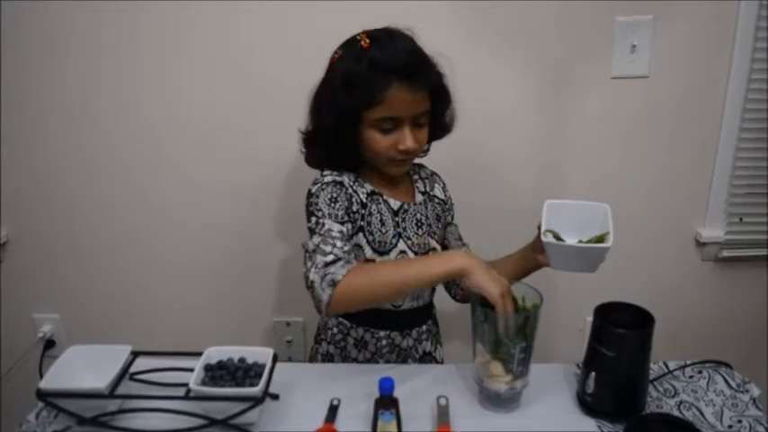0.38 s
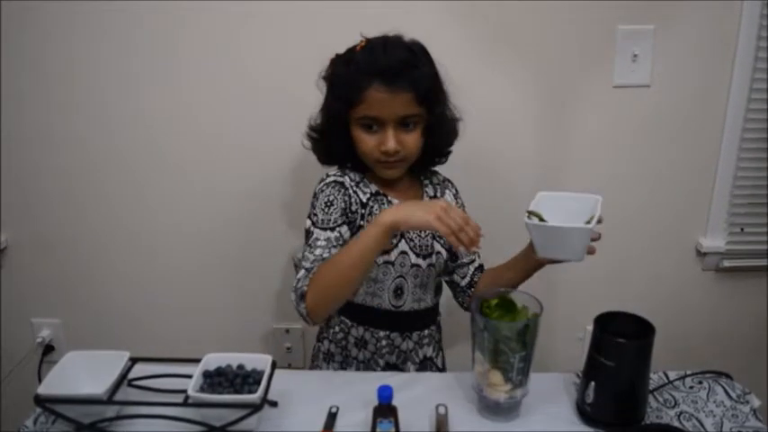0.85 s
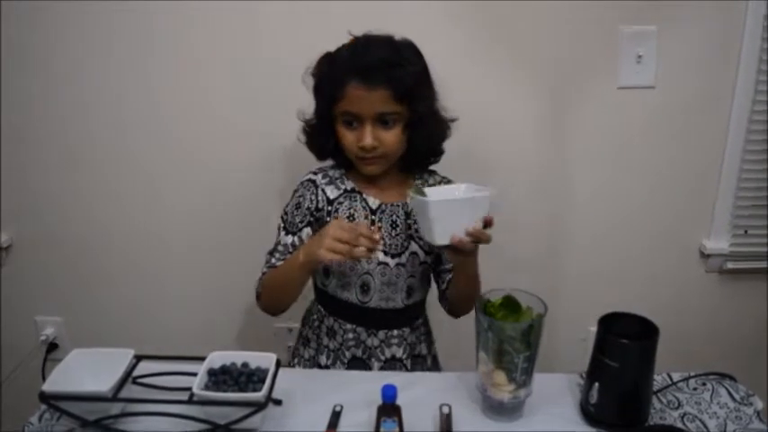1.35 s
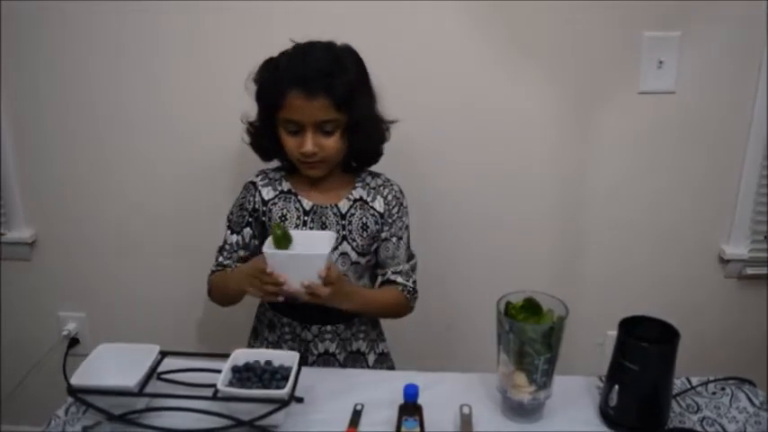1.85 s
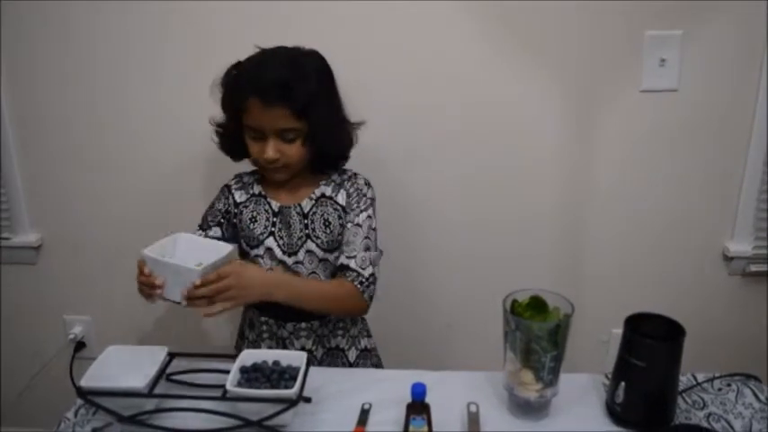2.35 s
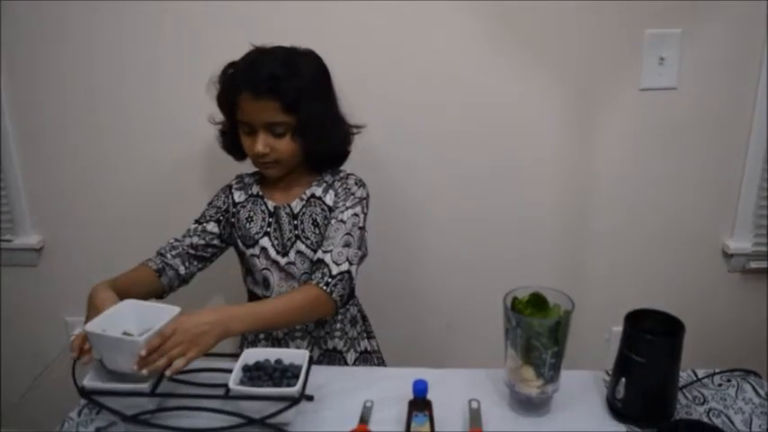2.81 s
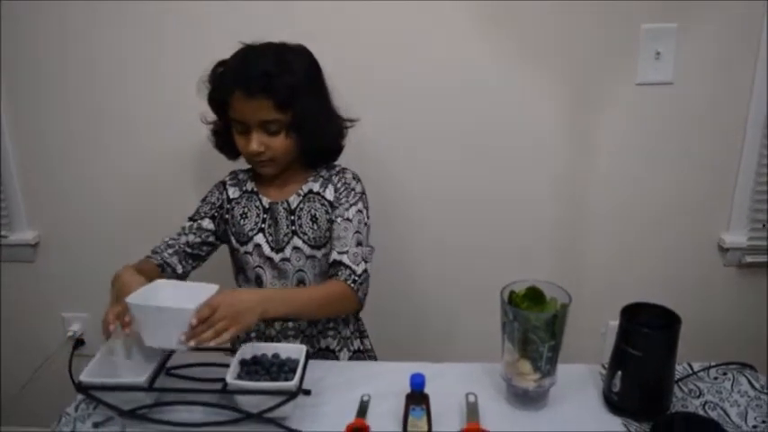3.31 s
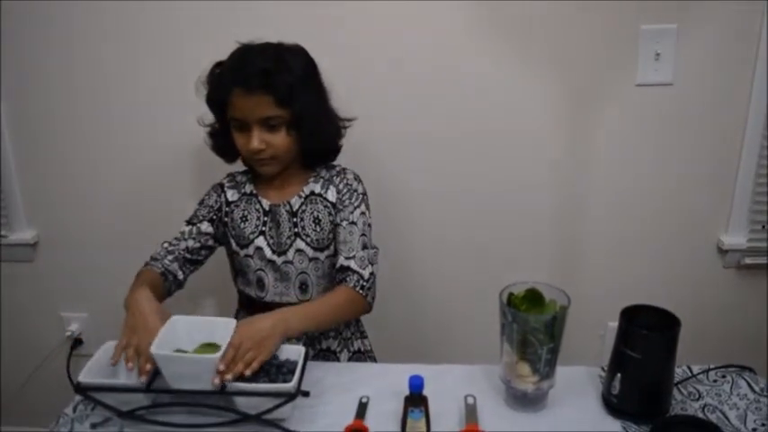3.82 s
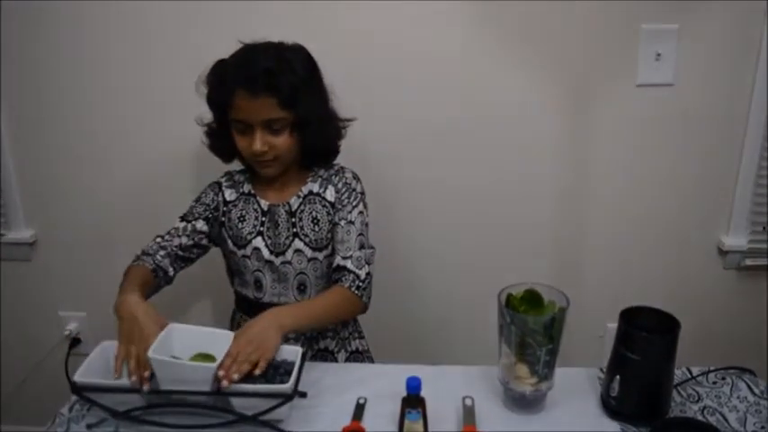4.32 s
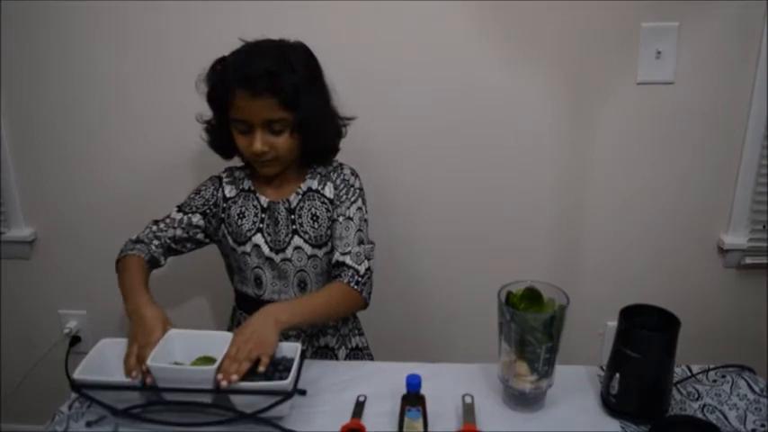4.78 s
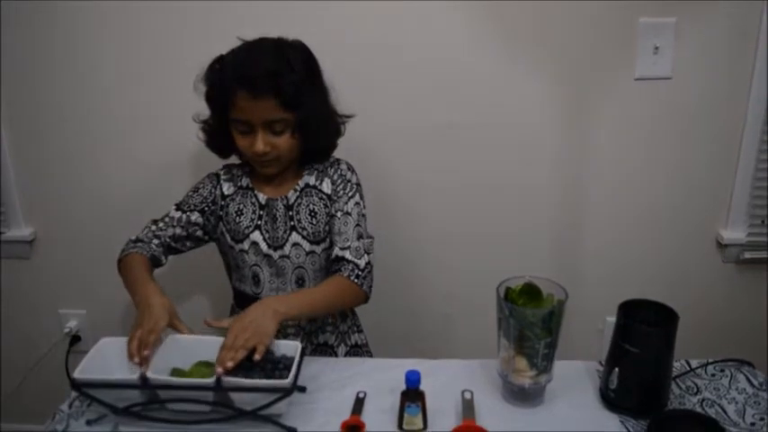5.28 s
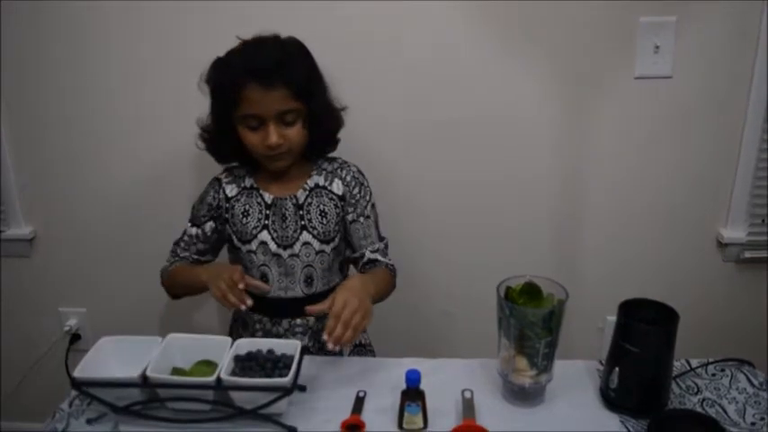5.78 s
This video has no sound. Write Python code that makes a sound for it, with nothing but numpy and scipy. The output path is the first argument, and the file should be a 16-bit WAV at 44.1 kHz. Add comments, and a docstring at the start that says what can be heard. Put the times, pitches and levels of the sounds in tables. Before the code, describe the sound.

In a quiet bare-walled kitchen, leaves crumple softly as fingers press them into a jar. After a pause, skin swishes over a glazed bowl, which then clinks ringingly onto a dish. Two seconds later it drops between neighbouring dishes with a loud, quick clatter, followed by a smaller knock and a faint brush of palms. The microphone stands at some distance, catching room echo, rumble and light hiss.

```python
"""Crockery knocks in a quiet kitchen: a bowl is set on a dish, then drops between neighbours in a wire stand.
Each blow rings decaying ceramic modes, cracks at the contact and thumps the table under the stand.
Before that leaves are pressed into a jar and the bowl swishes through the hands (noise under swelling gains);
late on, palms brush. Bare walls echo it all over room rumble and hiss."""
import sys
import numpy as np
from scipy import signal
from scipy.fft import rfft, irfft
from scipy.io import wavfile

SR = 44100
rng = np.random.default_rng(int(sys.argv[2]) if len(sys.argv) > 2 else 0)


def dump(signal):
    """Clip the signal to [-1, 1] and save it as 16-bit WAV at the path in sys.argv[1]."""
    limited = np.clip(np.atleast_2d(signal).T, -1, 1)
    pcm = np.round(limited * 32767).astype(np.int16)
    wavfile.write(sys.argv[1], SR, pcm)


def convert_level_to_amplitude(level_db):
    """Map a level in decibels to its linear amplitude factor."""
    exponent = np.asarray(level_db, float) / 20
    return 10 ** exponent


N = 260190
T = np.arange(N) / SR  # s
T_RING = T[:SR // 3]  # s, span of one blow


def unit(x):
    """Scale to rms 1."""
    return x / np.sqrt(np.mean(x ** 2))


def colour(x, points):
    """Shape the spectrum by (Hz, dB) points joined on a log-frequency axis; rms 1."""
    hz, db = np.transpose(points)
    f = np.fft.rfftfreq(len(x), 1 / SR) + 1
    gain = convert_level_to_amplitude(np.interp(np.log(f), np.log(hz), db))
    return unit(irfft(rfft(x) * gain, len(x)))


def band(x, hz, width_hz):
    """Resonant band-pass applied twice for steep skirts; width is that of one pass."""
    b, a = signal.iirpeak(hz, hz / width_hz, SR)
    once = signal.lfilter(b, a, x)
    return signal.lfilter(b, a, once)


def grains(rate_hz, spread_db, hiss):
    """Tiny slips at random moments and of widely spread size, over plain noise."""
    hit = rng.random(N) < rate_hz / SR
    size = convert_level_to_amplitude(spread_db * rng.exponential(size=N)) * rng.standard_normal(N)
    return unit(hit * size) + hiss * rng.standard_normal(N)


def strokes(rows, fade_db_per_s):
    """Gain over time: each stroke swells to its peak, then fades at a steady dB rate; powers add."""
    peak_s, swell_s, db = np.transpose(rows)[:, :, None]
    swell_loss_db = 18.5 * (peak_s - T) / swell_s  # climbs 18.5 dB in the swell time
    fade_loss_db = fade_db_per_s * (T - peak_s)
    gains = convert_level_to_amplitude(db - np.maximum(swell_loss_db, fade_loss_db))
    return np.sqrt((gains ** 2).sum(0))


# room tone spectrum: f/Hz, relative level/dB
ROOM_COLOUR = [(15, -46), (25, -24), (49, -3), (80, -7), (97, -6.5), (170, -1.5), (229, -5.5), (301, -7),
               (394, -13.5), (591, -16), (641, -18), (714, -15), (1890, -22.5), (9570, -31.5),
               (16000, -35.5)]


def room():
    """House rumble in the bass, a little lumpy, over steady microphone hiss."""
    return convert_level_to_amplitude(-50) * colour(grains(300, 0.9, 3.45), ROOM_COLOUR)


# leaf spectrum: f/Hz, relative level/dB
LEAF_COLOUR = [(180, -29), (300, -15), (421, -5), (599, 0), (867, -26), (1070, -1.5), (1340, -4.5),
               (1970, -7), (2130, -11), (3090, -1), (5170, -7.5), (9220, -2.5), (14000, -14)]
# fingers press the leaves: peak t/s, swell t/s, dull level/dB, bright level/dB
PRESSES = [(.008, 0.011, -48.5, -52), (.049, 0.0072, -48, -48.5), (.085, 0.057, -49, -50.5),
           (.245, .05, -52.5, -53), (.292, 0.079, -41, -44.5), (0.321, 0.02, -40, -46.5),
           (.455, 0.013, -52.5, -54), (.492, 0.027, -53.5, -53.5)]


def leaves():
    """Crumpling leaves: a duller body of creases and a brighter crackle of edges."""
    peak_s, swell_s, dull_db, bright_db = np.transpose(PRESSES)
    split_hz, fade_db_per_s = 4000, 357
    crumple = colour(grains(3000, 1.5, 0.8), LEAF_COLOUR)
    dull = signal.sosfilt(signal.butter(3, split_hz, fs=SR, output="sos"), crumple)
    bright = signal.sosfilt(signal.butter(3, split_hz, "high", fs=SR, output="sos"), crumple)
    dull_gain = strokes(np.c_[peak_s, swell_s, dull_db], fade_db_per_s)
    bright_gain = strokes(np.c_[peak_s, swell_s, bright_db], fade_db_per_s)
    return dull_gain * unit(dull) + bright_gain * unit(bright)


# faint treble whispers: peak t/s, swell t/s, level/dB
WHISPERS = [(1.474, .03, -61.5), (2.232, .03, -63), (3.522, 0.045, -65.5), (3.84, .02, -64.5),
            (4.53, .03, -65), (4.75, .1, -67)]


def whispers():
    """Grainy noise in a narrow treble band, faintly swelling and slowly fading."""
    treble = band(grains(820, 1.3, 0.86), 9640, 2000)
    return strokes(WHISPERS, 53) * unit(treble)


# sliding skin spectrum: f/Hz, relative level/dB
SWISH_COLOUR = [(600, -32), (1100, -6.5), (1230, -15), (1400, -3.5), (1650, -23), (2200, -2), (2400, -4),
                (2630, 3), (3100, -13.5), (4200, -20), (5200, -6.5), (7600, -8), (9500, -11.5),
                (11500, -6.5), (12500, -28)]
# skin slides over the glaze: peak t/s, swell t/s, level/dB
SLIDES = [(1.976, 0.01, -37), (2.028, 0.054, -34.5), (2.055, .02, -45)]


def swish():
    """Dry skin slides on glaze: dense small slips, coloured."""
    return strokes(SLIDES, 450) * colour(grains(4000, 0.6, 1.1), SWISH_COLOUR)


def ring(hz, width_hz, db):
    """Sum of decaying sines; neighbours start in opposite directions, wide resonances die fast and start louder."""
    t = T_RING[:, None]
    sign = (-1) ** np.arange(len(hz))
    fade = width_hz * np.exp(-np.pi * width_hz * t) * sign
    modes = convert_level_to_amplitude(db) * fade * np.sin(2 * np.pi * np.array(hz) * t)
    return modes.sum(1) / np.mean(width_hz)


# modes of each piece of crockery: f/Hz
PITCHES = dict( bowl=[755, 862, 968, 1050, 1168, 1297, 1459, 1700, 1805, 1912, 2376, 2487, 2766, 4003, 4230, 6500, 7160, 7711, 8740, 9200, 9604, 9738, 9916],
           left=[759, 1190, 1440, 1970, 2503, 2920, 3280, 4006, 4740, 5170, 5420, 5660, 6280, 6920, 7130, 7380, 7570, 8460, 8780, 9110, 9320, 9440, 9750, 11100],
           middle=[619, 1200, 1950, 2070, 2290, 2438, 2785, 3260, 3375, 3698, 4040, 4285, 4570, 4760, 4931, 5710, 6590, 6930, 7244, 7660, 8510, 8770, 9150, 9560, 9980, 11800],
           right=[2250, 2500, 3240, 3380, 3518, 3770, 3930, 4205, 4565, 4920, 5090, 5335, 5705, 6410, 6840, 7380, 8480, 8770, 9180, 9380, 9730],
           stand=[3520, 4720, 4990, 5220], rim=[2050, 2500, 2860, 4450, 9650])
# the same modes, in order: width/Hz, relative level/dB
RINGS = dict( bowl=[(34.7, -2), (30.3, 6), (45, 3), (23.148, -14), (22, 2.5), (23.148, 2), (12, 9),
         (29.8, -31), (28, -32), (27.5, 1), (25, -2), (20.5, 0), (22.68, -7.5), (25.2, -13), (22, -7),
         (185.19, -63), (37.037, -22), (23.6, -3.5), (30, -17), (30, -17), (23.8, -14), (25, -8),
         (32.4, -10)], left=[(31.481, -2), (34.8, 3), (35, -7.5), (26, -5.5), (30, 3), (25, 0), (109, -19),
         (46, -3.5), (73, -24), (49, -26), (26, -9), (25, -5), (31, -7), (25, -23), (27, -17), (108, -7.5),
         (25, -23), (32, -8), (44, -16), (36, -12), (25, -23), (30.24, -2), (30.24, -6), (40, -34)],
         middle=[(26.6, -7), (78, -12), (25, -2), (64, -2.5), (18, 6.5), (13, 7), (31, -4.5), (29, -22),
         (32, -3), (20, -12), (27, -3), (42, -20), (26, 0.5), (41, -14), (40, 2), (34, -1.5), (91, -10),
         (73, -5), (90, 3.5), (91, -16), (32, -9), (89, -17), (25, -10), (60, 4), (73, -11), (73, -16)],
         right=[(30, -5.5), (11, 6), (25, -10), (40, -11.5), (24.8, -8), (25, -18), (71, -5.5), (33.4, -7),
         (37, -3), (25, -11), (28, -7), (25, -10), (51, -5), (29, -12), (24, -9), (38, -3), (44, -16),
         (37, -15), (71, -10.5), (25, -12), (26, -9)], stand=[(40, -5), (30, -4), (35, 3), (30, -0.5)],
         rim=[(74, -4.5), (60, -2), (67, -5.5), (35, -1), (100, -9)])


def dish_rings():
    """Ceramic modes of each piece, struck once."""
    return {dish: ring(PITCHES[dish], *np.transpose(RINGS[dish])) for dish in RINGS}


# table top modes: f/Hz, width/Hz, relative level/dB
TABLE = [(120.6, 6.7, -9), (155.8, 5.6, 7), (204.4, 9.9, -1), (249, 15, 8), (351.7, 36, 3), (466, 58, 0.5)]


def table_thump():
    """Table top modes; the heavy top takes a while to get moving."""
    rise_s = 0.012
    return ring(*np.transpose(TABLE)) * (1 - np.exp(-T_RING / rise_s))


# low, middle and high crack bands: f/Hz, width of one pass/Hz
CRACKS = [(1100, 660), (3400, 3800), (7500, 6500)]
# high crack of each piece against its middle crack: level/dB
EDGE_DB = dict(bowl=0, stand=-9, left=-7, middle=-19, right=-25, rim=-12)


def contact_crack(dish, low_db, middle_db):
    """First touch, then rough glaze chatters; three bands, each scaled by its peak."""
    push = 0.28 * rng.standard_normal(len(T_RING)) * np.exp(-T_RING / 0.002)
    push[0] = -1
    # small dishes radiate no bass
    push = signal.sosfilt(signal.butter(4, 650, "high", fs=SR, output="sos"), push)
    out = np.zeros(len(push))
    levels_db = low_db, middle_db, middle_db + EDGE_DB[dish]
    for db, (hz, width_hz) in zip(levels_db, CRACKS):
        crack = band(push, hz, width_hz)
        out += convert_level_to_amplitude(db) * crack / np.abs(crack).max()
    return out


# blows: what rings, t/s, then level/dB of ring, low crack, middle crack, table thump
BLOWS = [("bowl", 2.8137, -20.5, -4, -27.5, -48), ("stand", 2.851, -43.5, -38, -47, -36),
         ("left", 4.8990, -30.5, -20, -26, -39), ("left", 4.9080, -15.5, -13.5, -6, -34),
         ("left", 4.9180, -29, -19.5, -29, -27.5), ("middle", 4.9592, -24.5, -16, -21, -26.5),
         ("middle", 4.966, -18, -19.5, -6.5, -36), ("middle", 4.9772, -46, -39, -20, -29.5),
         ("right", 5.2475, -26.5, -31, -18.5, -38.5)]
# light ticks on a rim: t/s, ring level/dB
TICKS = [(3.0498, -45), (5.7860, -48), (5.8860, -46)]


def blows():
    """Every blow rings a dish and thumps the table top (first row) and cracks at the contact (second row)."""
    out = np.zeros((2, N + SR))
    rings, thump = dish_rings(), table_thump()
    # a tick's low crack, middle crack and thump follow its ring level
    ticks = [("rim", s, db, db + 0.5, db - 2, db - 5.5) for s, db in TICKS]
    for dish, s, ring_db, low_db, middle_db, thump_db in BLOWS + ticks:
        start = int(s * SR)
        span = slice(start, start + len(T_RING))
        out[0, span] += convert_level_to_amplitude(ring_db) * rings[dish] + convert_level_to_amplitude(thump_db) * thump
        out[1, span] += contact_crack(dish, low_db, middle_db)
    return out[:, :N]


# palm spectrum: f/Hz, relative level/dB
HAND_COLOUR = [(590, -40), (1000, -10), (1400, -16), (2290, -4), (3890, -14), (4620, -0.5), (5860, -13),
               (8710, -9), (15000, -22)]
# palms brush: peak t/s, swell t/s, level/dB
BRUSHES = [(5.87, .08, -53), (5.888, 0.0093, -39)]


def palms():
    """Palms brush: sparser slips of wider spread, coloured."""
    return strokes(BRUSHES, 300) * colour(grains(1800, 1.9, 0.9), HAND_COLOUR)


# reverberation time of the walls: f/Hz, T60 t/s
WALL_T60 = [(150, 0.49), (1000, 0.34), (4000, 0.35), (10000, 0.22)]
# table and near wall: delay t/s, level/dB
ECHOES = [(.0045, -13), (.0098, -9.5)]


def walls(x, wet_db):
    """Two early echoes in a dense tail that sets in at once and loses its treble first."""
    t = T[:SR // 2]
    hz, t60_s = np.transpose(WALL_T60)
    tail = np.zeros(len(t))
    for f in 125 * 2.0 ** np.arange(7):  # octaves, Hz
        noise = unit(band(rng.standard_normal(len(t)), f, f / 1.35))
        decay_s = np.interp(np.log(f), np.log(hz), t60_s)
        tail += np.sqrt(f) * noise * np.exp(-np.log(1000) * t / decay_s)
    tail = tail * (1 - np.exp(-t / 0.00097))
    tail = convert_level_to_amplitude(wet_db) * tail / np.sqrt(np.sum(tail ** 2))
    for delay_s, db in ECHOES:
        tail[int(delay_s * SR)] += convert_level_to_amplitude(db)
    return signal.fftconvolve(x, tail)[:N]


def scene():
    """Near sounds with their echoes, dulled at the top by the microphone port, over the room tone."""
    rings, cracks = blows()
    soft = swish() + palms() + whispers() + leaves()
    # cracks spread all round and stir the room most; rings and soft sounds face the listener
    echoes = walls(cracks + convert_level_to_amplitude(-5) * rings + convert_level_to_amplitude(-7) * soft, wet_db=-2.7)
    near = rings + cracks + soft + echoes
    port = signal.butter(3, 11000, fs=SR, output="sos")
    return (signal.sosfilt(port, near) + room())[None]


def low_pass(x):
    """Removes everything above the highest recorded frequency."""
    return signal.sosfilt(signal.butter(12, 15900, fs=SR, output="sos"), x)


def record(dry):
    """The finished mix, with the treble cut off above 15.9 kHz."""
    return low_pass(dry)


dry = scene()
out = record(dry)
dump(out)
```